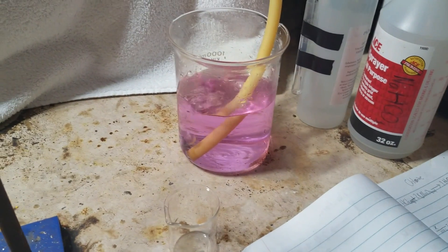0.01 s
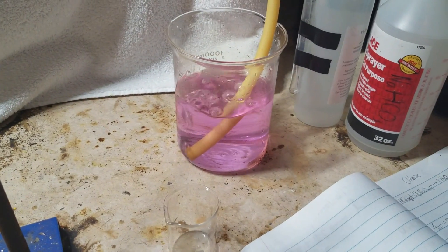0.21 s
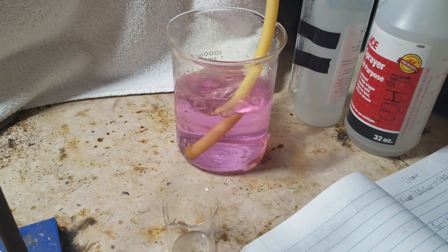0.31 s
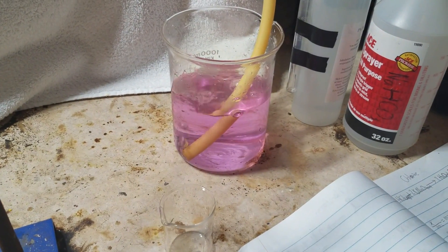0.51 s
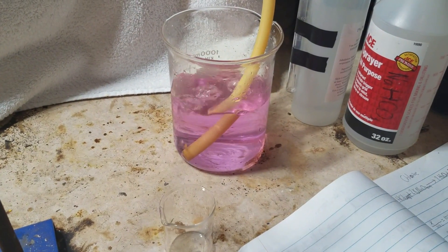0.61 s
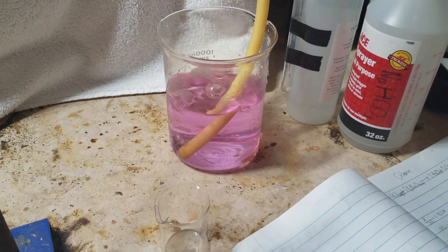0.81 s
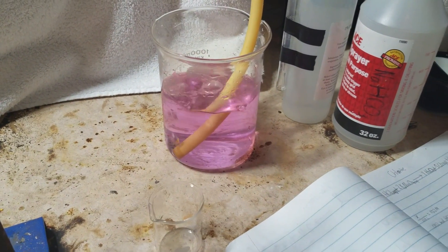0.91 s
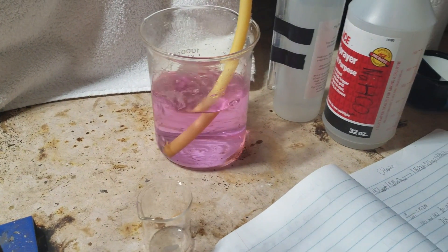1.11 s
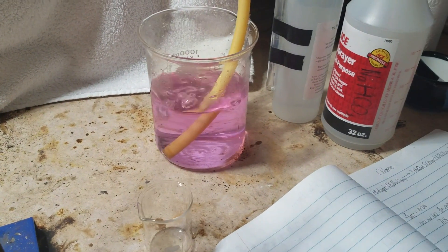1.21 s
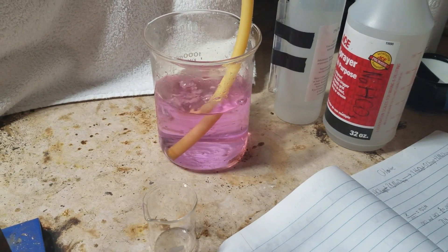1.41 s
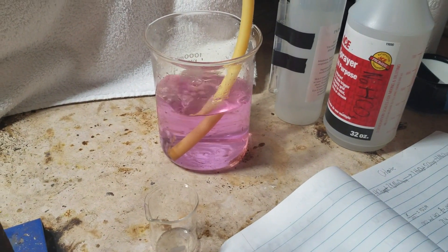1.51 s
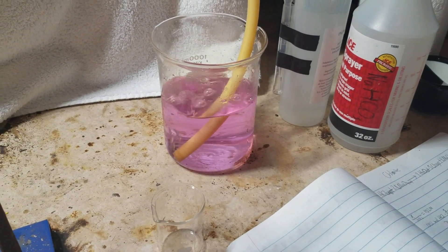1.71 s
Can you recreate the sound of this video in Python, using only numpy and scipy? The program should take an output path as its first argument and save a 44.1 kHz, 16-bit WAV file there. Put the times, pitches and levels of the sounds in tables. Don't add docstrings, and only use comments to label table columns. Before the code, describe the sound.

Low, round bubble blips run throughout in a beaker of liquid, with tiny droplet ticks. Early on, a dull scrape and a loud hollow knock, then faint bumps and rustles; close stereo microphone, quiet small room.

```python
import sys
import numpy as np
from scipy import signal
from scipy.fft import rfft, irfft, next_fast_len
from scipy.io import wavfile
from scipy.ndimage import map_coordinates

SR = 44100
rng = np.random.default_rng(int(sys.argv[2]) if len(sys.argv) > 2 else 0)


def ratio(d):
    e = np.asarray(d, float) / 20
    return 10 ** e


def bounce(signal):
    frames = np.transpose(np.atleast_2d(signal))
    limited = np.clip(frames, -1, 1)
    pcm = np.round(limited * 32767).astype(np.int16)
    wavfile.write(sys.argv[1], SR, pcm)


N = 79380
FAN_LAG = -15.5


def unit(x):
    return x / np.sqrt(np.mean(x ** 2) + 1e-20)


def along(points, hz):
    f, v = np.transpose(points)
    return np.interp(np.log(hz + 1), np.log(f + 1), v)


def wobble(rate):
    knots = rng.standard_normal(int(N * rate / SR) + 4)
    return map_coordinates(knots, [np.arange(N) * rate / SR])


def filtered(x, response):
    m = next_fast_len(x.shape[-1] + 8192)
    spectrum = rfft(x, m) * response(np.fft.rfftfreq(m, 1 / SR))
    return irfft(spectrum, m)[..., :x.shape[-1]]


def resonant(x, peaks):
    def response(f):
        total = 0
        for k, (centre, width, db) in enumerate(peaks):
            damping = 1j * f * width
            total = total + (-1) ** k * ratio(db) * damping / (centre * centre - f * f + damping)
        return total
    return filtered(x, response)


def add(track, s, x):
    part = track[..., max(round(s * SR), 0):][..., :x.shape[-1]]
    part += x[..., :part.shape[-1]]


def ports(x, lag, left_db, own):
    side = np.array([[1], [-1]])
    pair = filtered(np.array([x, x]), lambda f: np.exp(-1j * np.pi * f * lag / SR * side))
    return ratio(left_db / 2 * side) * (pair + own)


def rumble():
    # f/Hz, level/dB per Hz
    shudder = [(20, -35.5), (40, -25.5), (60, -3.5), (110, -6), (150, -21), (300, -74.5)]
    common, *own = filtered(rng.standard_normal((3, N)), lambda f: ratio(along(shudder, f)))
    return ratio(-73 + 2 * wobble(6.4)) * unit(ports(common, 0, 13.5, 0.44 * np.array(own)))


def floor():
    # f/Hz, level/dB per Hz
    fan_spectrum = [(90, -77.5), (150, -17), (250, -11), (450, -8), (800, -7), (1400, -12.5), (2300, -16.5),
                    (5000, -29), (9500, -66)]
    # f/Hz, level/dB per Hz
    hiss_spectrum = [(1760, -19.5), (3000, -17), (4840, -8), (6340, -9.5), (8840, -9), (15700, -7)]
    common, *own = filtered(rng.standard_normal((3, N)), lambda f: ratio(along(fan_spectrum, f)))
    fan = ratio(-57.5 + 0.7 * wobble(5.77)) * unit(ports(common, FAN_LAG, 0.14, 0.742 * np.array(own)))
    hiss = unit(filtered(rng.standard_normal((2, N)), lambda f: ratio(along(hiss_spectrum, f))))
    left_db = 3.5
    return fan + ratio(-67.5 + 0.38 * wobble(1.22)) * hiss * ratio([[left_db / 2], [-left_db / 2]])


def room(x):
    # f/Hz, t60/s
    decay = [(200, 0.234), (2000, 0.159), (10000, 0.1304)]
    low_hz = 190
    hz, t, z = signal.stft(rng.standard_normal((3, SR // 2)), SR, nperseg=256)
    tail = signal.istft(z * ratio(-60 * t / along(decay, hz)[:, None]), SR, nperseg=256)[1]
    tail = tail[0] + 1.24 * tail[1:]
    sent = filtered(x, lambda f: (1j * f / (low_hz + 1j * f)) ** 2)
    delayed = np.pad(sent, (200, 0))[None]
    return signal.fftconvolve(delayed, tail / np.linalg.norm(tail[0]), axes=1)[:, :N]


def rustles():
    centres = [1.30, 1.335, 1.662, 1.77, .64, 1.62, .835, .91]
    # length/s, level/dB, brightness 0-1
    swells = [(0.045, -59.5, 0.57), (0.06, -58, 0.4), (.028, -51, 0.38), (0.022, -53, 0.37),
              (0.034, -64, 0.6), (0.057, -60, 0.54), (0.03, -61, 1), (0.037, -60, 0.33)]
    # f/Hz, width/Hz, level/dB
    dull_peaks = [(884, 2000, -18), (2076, 850, -11.5), (4300, 610, -21)]
    # f/Hz, width/Hz, level/dB
    bright_peaks = [(7700, 4000, -3), (14540, 2670, 1.5)]
    out, t = np.zeros((2, N)), np.arange(N) / SR
    dull, bright = [unit(resonant(rng.standard_normal((2, N)) * ratio(2 * wobble(220)), peaks))
                    for peaks in (dull_peaks, bright_peaks)]
    for s, (length, db, share) in zip(centres, swells):
        swell = ratio(db) * np.exp(-((t - s) / (length / 2)) ** 2)
        out += swell * ((1 - share) * dull + share * bright)
    return out * ratio([[3], [-3]])


def slide():
    # t/s, level/dB
    effort = [(0, -51), (.15, -51), (.3, -53.5), (.42, -55), (.52, -56), (.57, -63.5), (.66, -61.5),
              (.72, -72.5)]
    # f/Hz, width/Hz, level/dB
    surface = [(438.3, 111.2, 17), (678.2, 95.6, 15.5), (1197, 366, 11.5), (1826, 133, -10),
               (2164, 1510, -3), (2960, 650, -31.5), (4177, 458, -9), (6800, 1560, -28.5),
               (13760, 21000, -29)]
    s, db = np.transpose(effort)
    level = ratio(np.interp(np.arange(N) / SR, s, db) + 8)
    grain = ratio(0.744 * wobble(270) + 0.6 * wobble(24.23))
    common, *own = resonant(rng.standard_normal((3, N)) * grain, surface)
    return level * unit(ports(common, -7.5, 2.63, 0.825 * np.array(own)))


def bumps():
    contacts = [
        .2175,
        .229,
        .243,
        .286,
        .305,
        .622,
        1.329,
        1.335,
        1.668,
        1.768,
    ]
    # peak level/dB, boom level/dB, t60/s, hardness/dB
    blows = [(-21, -40.5, 0.0405, 2.5), (-26.5, -65, 0.12, -19.5), (-27, -47, 0.086, -9),
             (-29, -52, 0.067, -4), (-42, -57, 0.246, -29.5), (-35.5, -44, 0.059, 3.5),
             (-44.5, -66, 0.031, 4.5), (-39, -52.5, 0.05, 4.5), (-44.5, -52.5, 0.0327, 1.5),
             (-43, -47.5, 0.033, -21.5)]
    # f/Hz, width/Hz, level/dB
    board = [(229, 79.5, -6.5), (274, 34.8, -2.5), (368.5, 40.4, -2.5), (590.5, 102, -1)]
    # f/Hz, width/Hz, level/dB
    edge = [(844.4, 164, -1.5), (1128.5, 80, -9.5), (1887, 1070, -16.5)]
    # t/s, peak level/dB, f/Hz, t60/s
    rings = [(0.2183, -18.5, 228.7, 0.0647), (.2178, -17.5, 781.2, 0.0233), (0.2183, -28.5, 1139, 0.0375),
             (.2178, -32, 2047, 0.0327), (.2178, -31.5, 1577, 0.0217), (0.2182, -33.5, 2525, 0.0248),
             (.226, -23.5, 361.8, 0.115), (.228, -27.5, 494, 0.062), (.238, -19.5, 294.6, 0.0543),
             (.245, -26, 552, 0.056), (0.257, -36, 287, 0.089), (0.274, -33.5, 330.6, 0.061),
             (0.2863, -26.5, 293.9, 0.048), (.2865, -31.5, 623.6, 0.0446), (.288, -21, 888, 0.013),
             (.304, -31.5, 312.6, 0.07), (.343, -38, 367.9, 0.135)]
    boom_hz, boom_s, blow_db, soft_hz = 106.97, 0.0179, -7.5, 2600
    out, t = np.zeros(N), np.arange(SR // 3) / SR
    for s, (db, boom_db, t60, hard_db) in zip(contacts, blows):
        low, high = rng.standard_normal((2, len(t)))
        x = resonant(low * (ratio(-60 * t / t60) + ratio(blow_db - 60 * t / 0.0026)), board)
        x += ratio(hard_db) * resonant(high * (ratio(-90 * t / t60) + ratio(blow_db - 60 * t / 0.0023)), edge)
        x = filtered(x, lambda f: 1 / (1 + 1j * f / soft_hz) ** 2)
        swell = t / boom_s * np.exp(-.5 * (t / boom_s) ** 2)
        boom = ratio(boom_db + 4) * swell * np.sin(2 * np.pi * boom_hz * t)
        add(out, s, ratio(db) * x / np.abs(x).max() + boom)
    for s, db, hz, t60 in rings:
        onset = 1 - np.exp(-t / 0.00197)
        add(out, s, -ratio(db - 60 * t / t60) * onset * np.sin(2 * np.pi * hz * t))
    return out


def ticks():
    # t/s, peak level/dB, f/Hz, broad crack level/dB
    drops = [(0.4579, -49.5, 8140, -14), (0.6222, -51, 7500, -3.5), (0.712, -51.5, 10800, -9.5),
             (0.8228, -37, 10360, -20), (0.8434, -59, 10400, -14), (0.974, -51.5, 15100, 3),
             (1.1029, -53.5, 14350, -3.5), (1.1339, -52, 14700, -4), (1.1892, -55.5, 8660, -16.5),
             (1.3493, -50.5, 14200, 3.5), (1.4404, -43.5, 9800, -22), (1.4889, -50.5, 15000, -22),
             (1.5333, -35, 13560, -14), (1.6513, -45.5, 12300, -2), (1.6836, -53.5, 10500, -6),
             (1.701, -46.5, 11030, -24), (1.757, -49, 12150, 0.5), (1.7712, -49, 6900, 3.5),
             (1.657, -48, 4160, 3.5), (1.663, -55, 11500, 0), (1.671, -61.5, 4300, -1),
             (1.783, -48, 4910, 3)]
    out, t = np.zeros(N), np.arange(SR // 20) / SR
    decay = ratio(-60 * t / 0.016) + ratio(-60 * t / 0.0021)
    onset = 1 - np.exp(-t / 0.0005)
    for s, db, hz, crack_db in drops:
        a, b = rng.standard_normal((2, len(t)))
        ring = unit(resonant(resonant(a, [(hz, 0.127 * hz, 0)]), [(hz, 0.247 * hz, 0)]))
        crack = unit(resonant(b, [(3000, 10600, 0)]))
        add(out, s, ratio(db - 5) * decay * onset * (ring + ratio(crack_db) * crack))
    return out


def chirps():
    starts = [.54, .725, .925, 1.566, 1.752, 1.563, 1.325]
    pitches = [750, 740, 720, 760, 750, 3050, 640]
    # peak level/dB, rise of pitch as a share
    bursts = [(-46.5, 0.441), (-45.5, 0.273), (-53.5, 0.327), (-42.5, 0.23), (-55.5, 0.428), (-48, 0.047),
              (-47, 0.148)]
    out, t = np.zeros(N), np.arange(SR // 4) / SR
    u = t / 0.0197
    for s, hz, (db, rise) in zip(starts, pitches, bursts):
        jitter = 9e-5 * wobble(447.4)[:len(t)]
        tone = np.sin(2 * np.pi * hz * (t + rise * t * u / 2 + jitter))
        add(out, s, ratio(db) * 2.52 * u * np.exp(-2 * u * u) * tone)
    return out


def gulps():
    # t/s, peak level/dB, f/Hz, life/s
    releases = [(0.024, -48, 587, 0.024), (0.061, -45, 444.7, 0.013), (0.112, -39, 365, 0.0149),
                (0.159, -42, 561.6, 0.0292), (0.329, -45.5, 362.8, 0.0414), (0.407, -43.5, 465.7, 0.0158),
                (0.429, -42.5, 408.5, 0.0189), (0.454, -42.5, 403.8, 0.0283), (0.508, -40.5, 508.7, 0.0296),
                (0.599, -37.5, 544, 0.0083), (0.612, -43.5, 425.7, 0.0163), (0.647, -41.5, 410.8, 0.0161),
                (0.662, -42, 383.3, 0.0144), (0.698, -39.5, 509.4, 0.0276), (0.79, -37, 480.6, 0.0096),
                (0.801, -43.5, 414.5, 0.0147), (0.826, -47.5, 398.5, 0.019), (0.881, -45.5, 448, 0.0131),
                (0.888, -43, 493.8, 0.0174), (0.924, -47, 478.4, 0.0127), (0.985, -42.5, 436, 0.00517),
                (1.018, -44, 391.8, 0.0123), (1.032, -46.5, 373.3, 0.024), (1.071, -43, 533.6, 0.0201),
                (1.069, -48.5, 368.2, 0.0168), (1.094, -51, 389, 0.0157), (1.185, -46, 446, 0.00695),
                (1.2, -42, 395.9, 0.0172), (1.221, -45.5, 392.3, 0.014), (1.249, -45.5, 403.6, 0.0166),
                (1.266, -53, 375, 0.0368), (1.377, -41.5, 452.3, 0.0091), (1.398, -43.5, 399, 0.0102),
                (1.44, -46.5, 374.6, 0.0177), (1.455, -50, 361.5, 0.0282), (1.555, -52, 519, 0.01),
                (1.565, -38, 423.4, 0.00414), (1.581, -45, 391.8, 0.0255), (1.631, -46, 373.7, 0.0144),
                (1.645, -45, 365, 0.019), (1.68, -57, 381.4, 0.0088), (1.744, -44.5, 434, 0.0196),
                (1.788, -50.5, 414, 0.03)]
    # f/Hz, level/dB
    beaker = [(75, -23), (110, -19), (250, -7.5), (368, -8), (455, -12), (610, -16.5)]
    # f/Hz, width/Hz, level/dB
    neck = [(732, 546, 0)]
    out, t = np.zeros(N), np.arange(SR // 4) / SR
    onset = 1 - np.exp(-t / 0.00255)
    for s, db, hz, life in releases:
        note = np.exp(-(t / life) ** 2) * np.sin(2 * np.pi * hz * (t + 0.01636 * t * t / life))
        snap = resonant(resonant(rng.standard_normal(len(t)) * ratio(-60 * t / 0.0392), neck), neck)
        glass = np.zeros(len(t))
        for mode_hz, level in beaker:
            scatter, detune = rng.standard_normal(2)
            ring = np.sin(2 * np.pi * mode_hz * (1 + 0.0228 * detune) * t)
            glass += ratio(2 + level + 2 * scatter - 60 * t / 0.075) * ring
        add(out, s - .002, ratio(db) * (onset * (note + glass) + ratio(-11) * snap / np.abs(snap).max()))
    return out


def bubbles():
    return (gulps() + chirps()) * (1 + 0.12 * wobble(150))


def scene():
    water, knock, drops = bubbles(), bumps(), ticks()
    near = ports(water, -5.5, 0, 0) + ports(knock, -7.5, 1, 0) + ports(drops, FAN_LAG, 8.5, 0)
    reverberant = ratio(-5.5) * room(0.3 * water + knock + 0.3 * drops)
    return near + reverberant + slide() + rustles() + floor() + rumble()


def roll_off(x):
    return signal.sosfilt(signal.butter(12, 16980, fs=SR, output="sos"), x)


def record(dry):
    mix = filtered(dry, lambda hz: hz < 15900) - 0.00053
    return roll_off(mix)


dry = scene()
out = record(dry)
bounce(out)
```